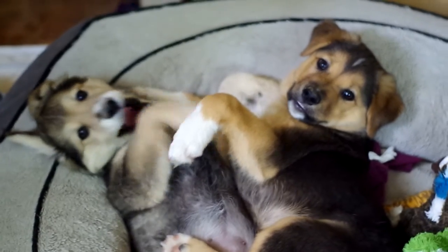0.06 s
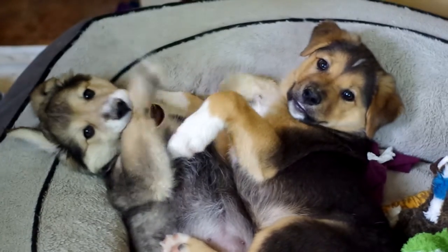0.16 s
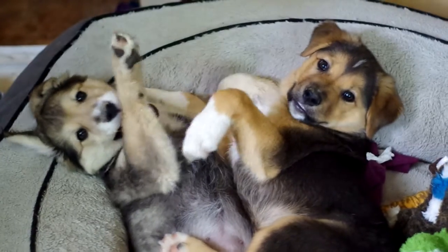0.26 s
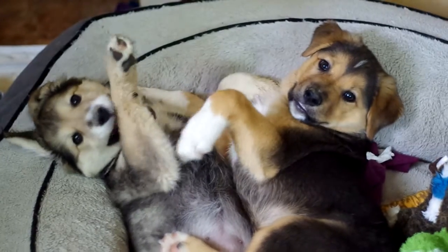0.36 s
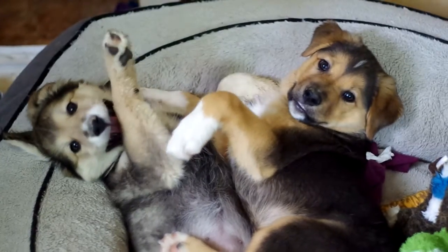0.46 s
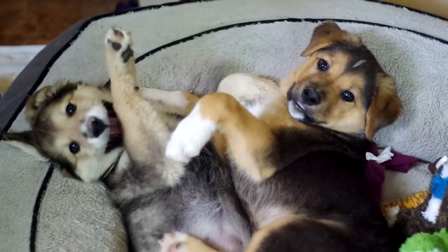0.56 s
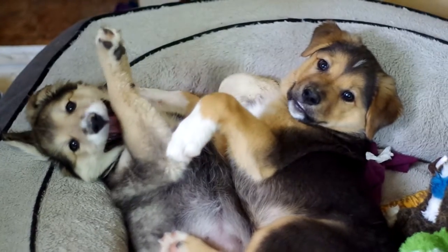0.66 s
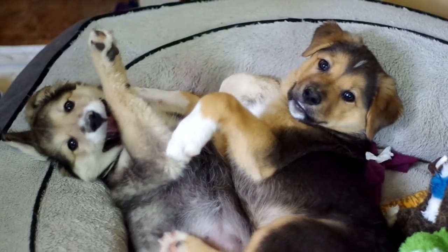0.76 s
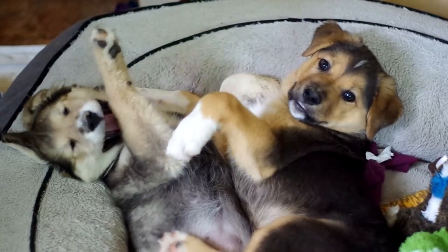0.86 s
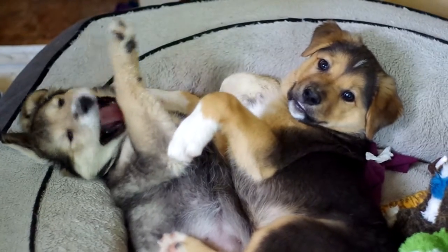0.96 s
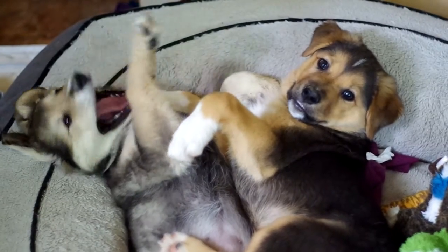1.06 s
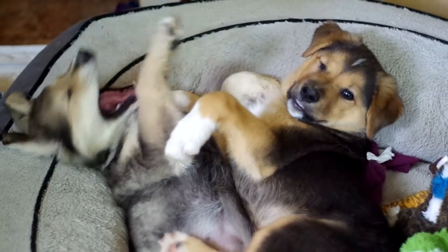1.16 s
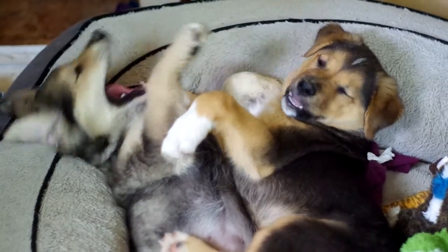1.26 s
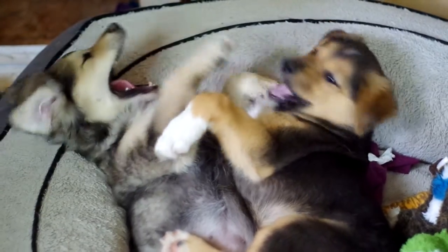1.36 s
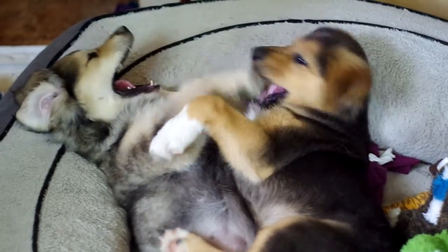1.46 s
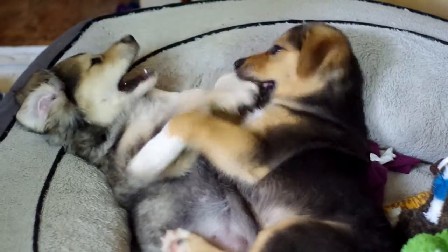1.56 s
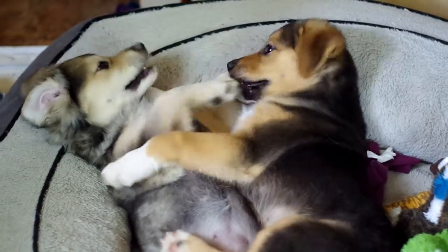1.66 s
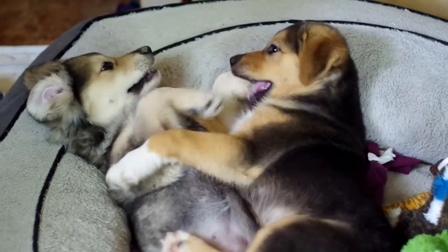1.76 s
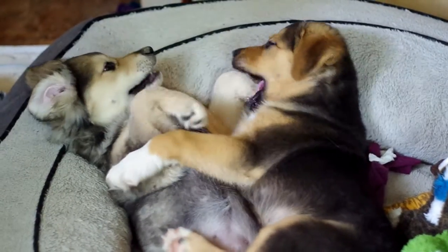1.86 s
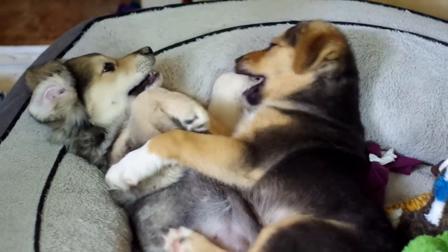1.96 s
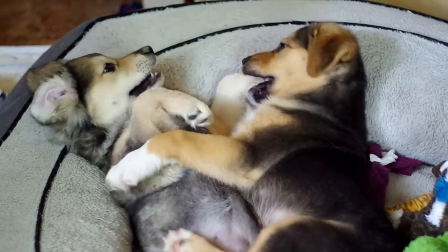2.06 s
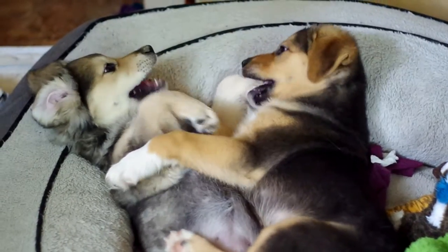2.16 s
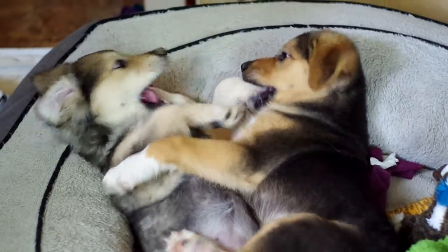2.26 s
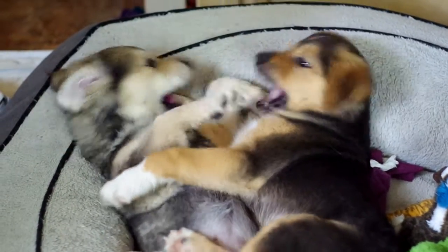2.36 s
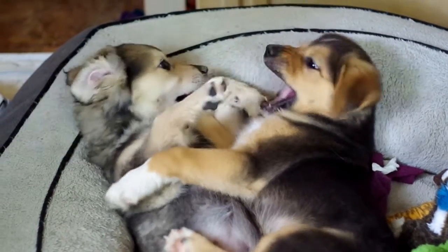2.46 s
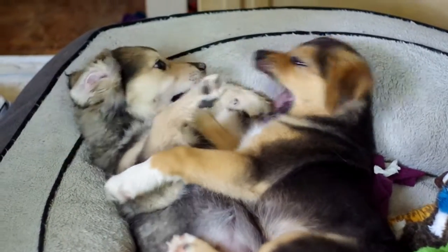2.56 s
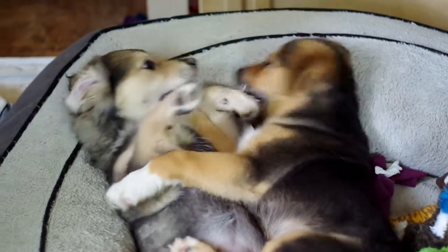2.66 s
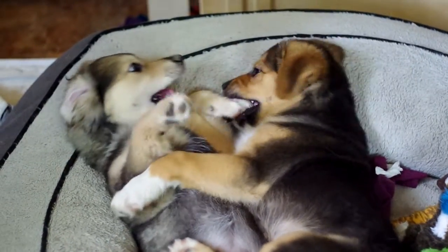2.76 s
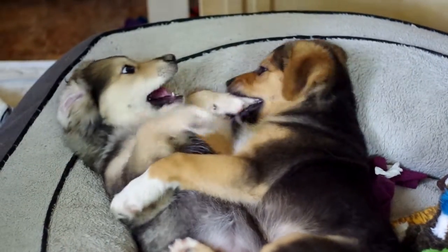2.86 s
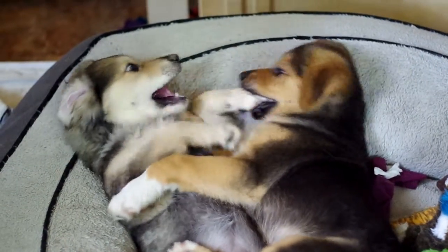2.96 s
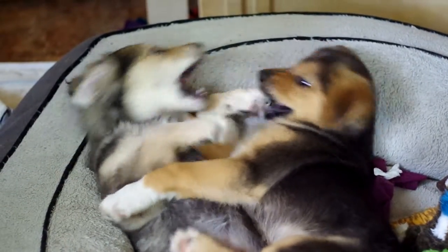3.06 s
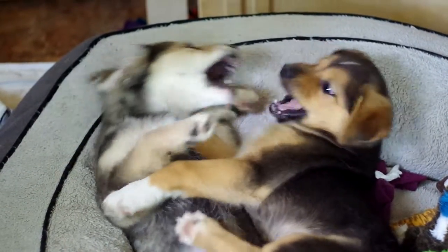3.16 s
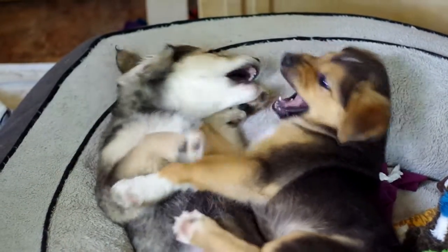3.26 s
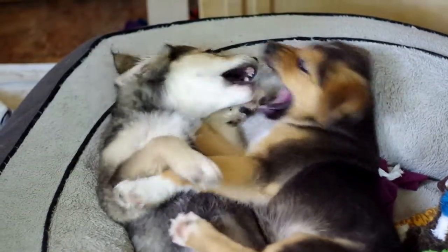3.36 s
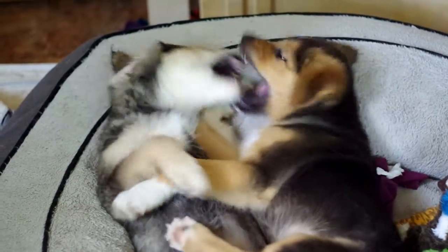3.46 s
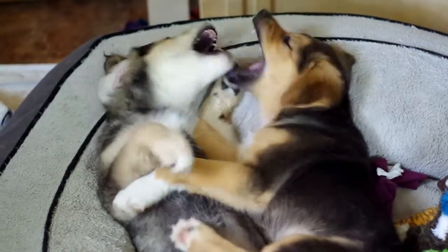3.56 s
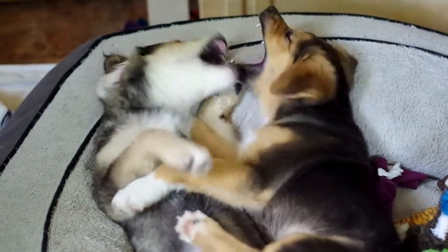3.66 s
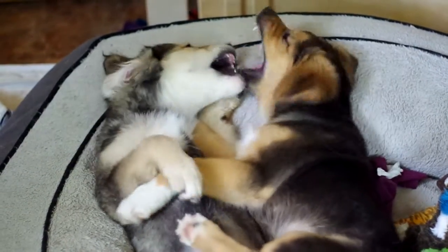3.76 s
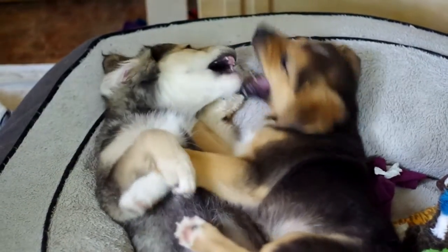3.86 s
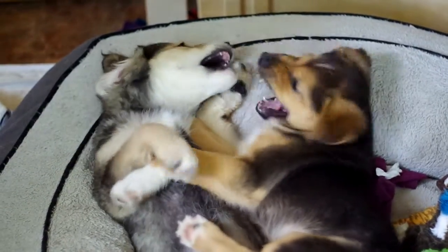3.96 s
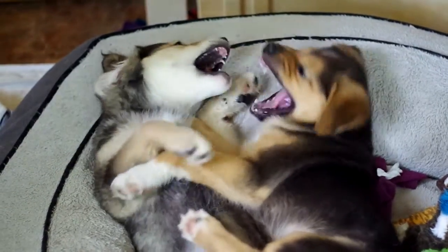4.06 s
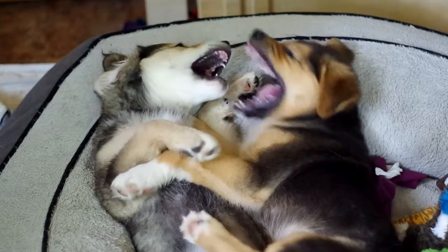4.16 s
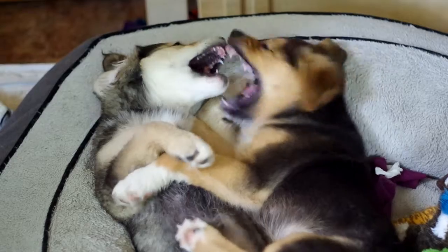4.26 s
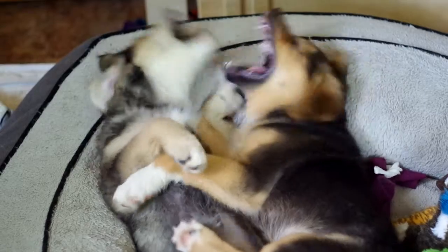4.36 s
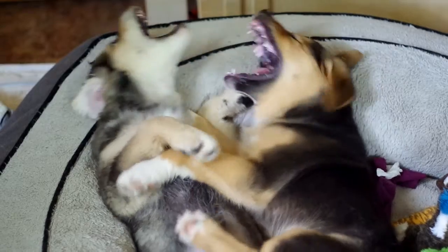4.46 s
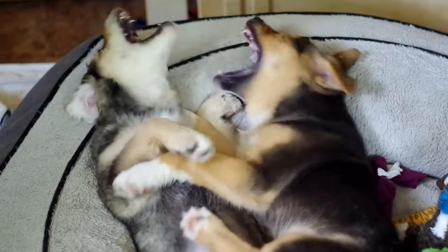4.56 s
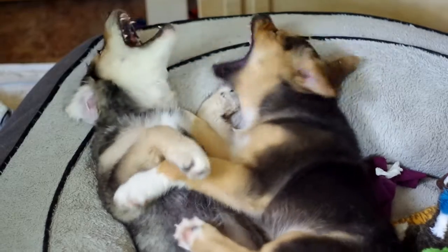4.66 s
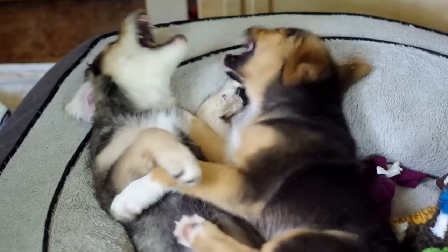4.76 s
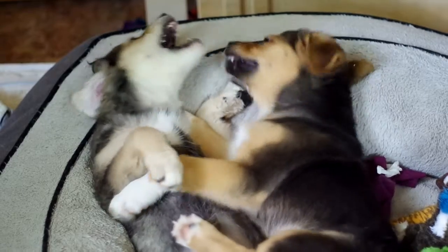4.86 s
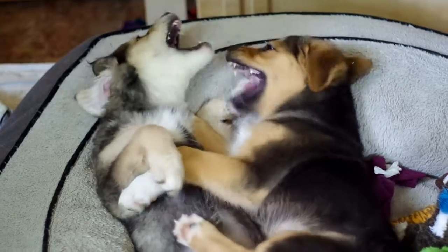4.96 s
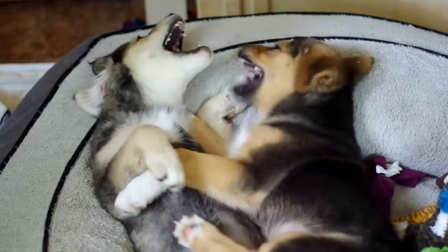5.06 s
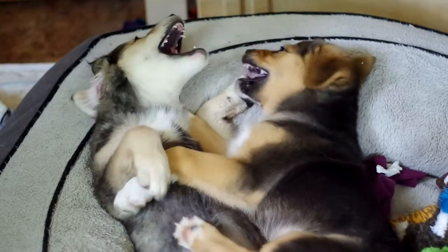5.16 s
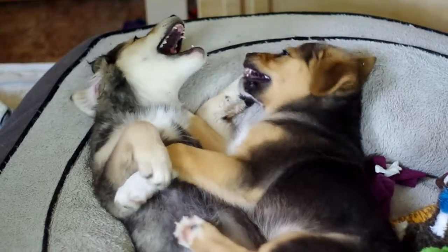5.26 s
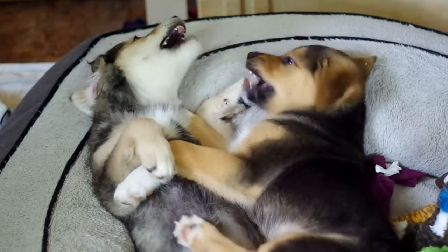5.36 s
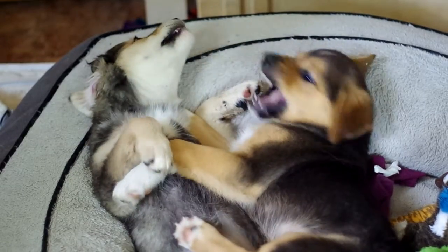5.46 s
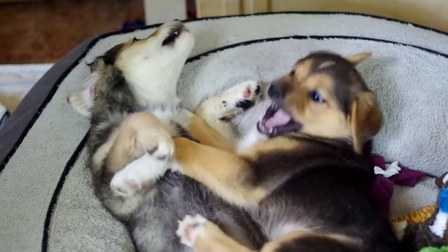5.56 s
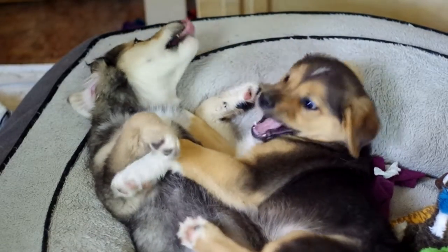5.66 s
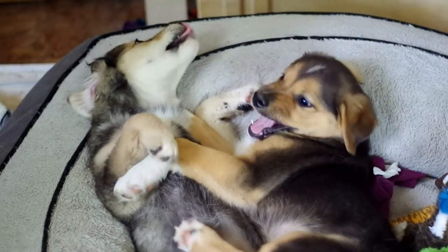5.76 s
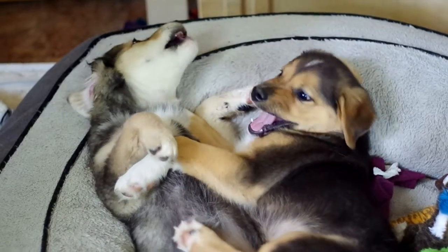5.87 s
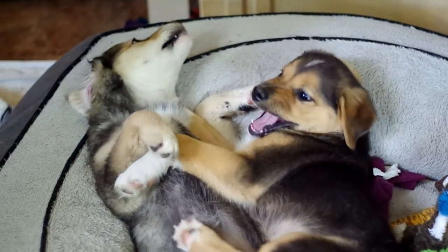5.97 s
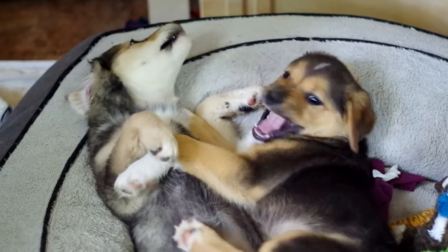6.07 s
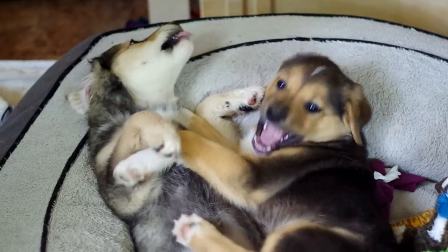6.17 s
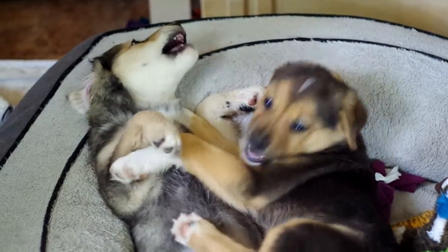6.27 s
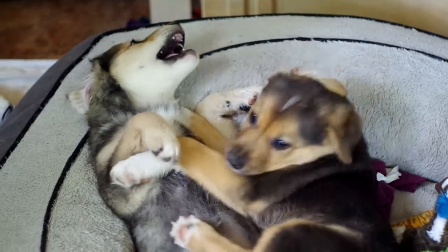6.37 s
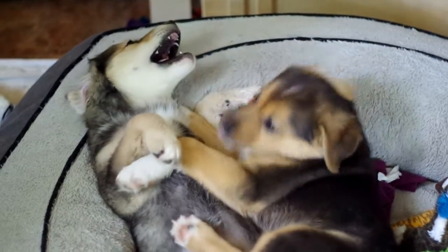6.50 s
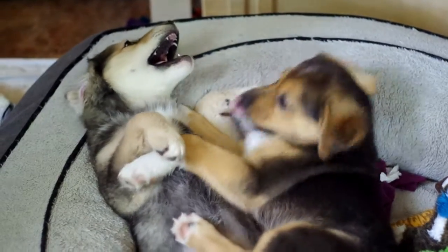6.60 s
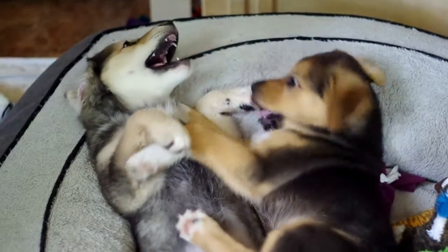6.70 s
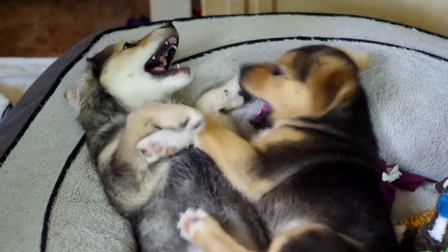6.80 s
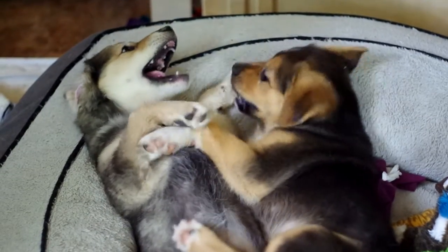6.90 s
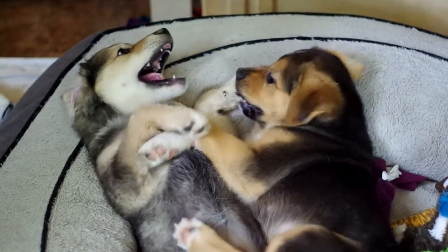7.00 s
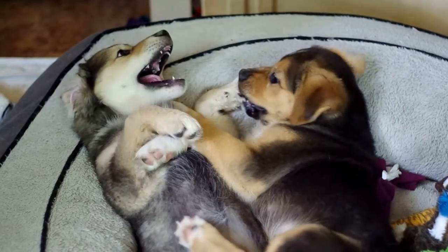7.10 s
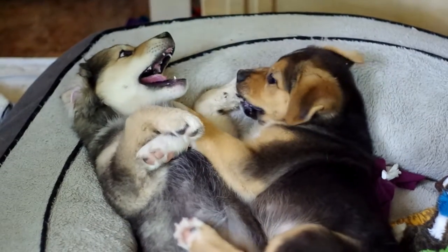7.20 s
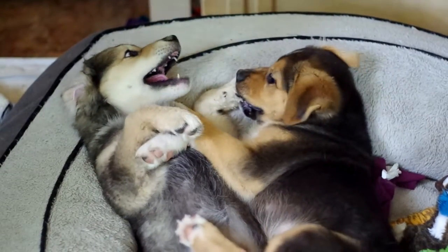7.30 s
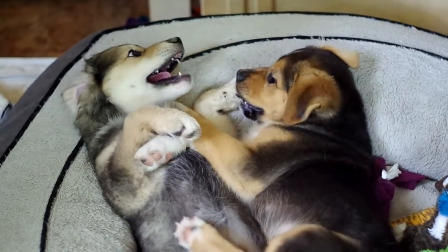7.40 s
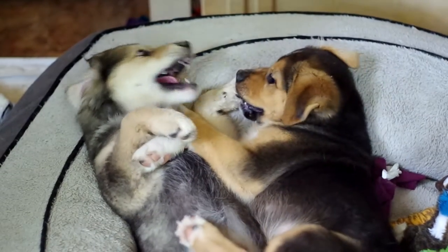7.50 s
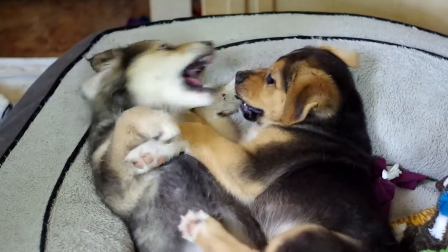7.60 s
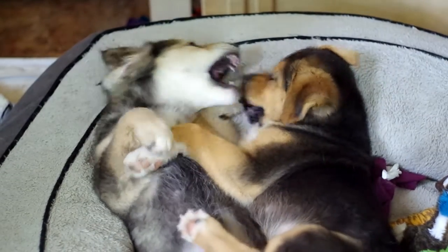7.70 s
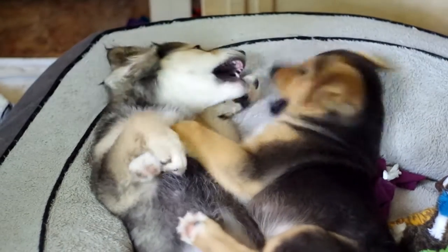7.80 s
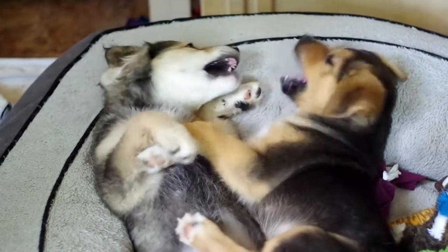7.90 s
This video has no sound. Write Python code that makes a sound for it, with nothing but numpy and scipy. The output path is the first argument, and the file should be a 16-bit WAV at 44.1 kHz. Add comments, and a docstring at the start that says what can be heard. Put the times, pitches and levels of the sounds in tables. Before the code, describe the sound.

Close, mono indoor sound of puppies play-fighting. Quiet hiss and a low unsteady appliance hum come first, then light breathy panting and soft gliding whines. The play grows busier with brief hoarse yips, airy throat whistles and small snaps of jaws and paws. One shrill yelp stands out past the middle; it eases briefly, then squeals, whines and strong hissy panting return, with a short room echo.

```python
"""Two puppies wrestle on a dog bed in a quiet room, close to one mono microphone.
Sharp yips and soft whines come from the vocal folds, as stacks of partials on a gliding pitch.
Thin high tones, mostly whistles of air forced through the narrowed throat, are chopped by the folds.
Panting hisses around the calls as shaped noise, and jaws and paws click in short noise bursts.
The room rings on behind the dogs, an appliance hums, a screen whines, and air and microphone hiss."""
import sys
import numpy as np
from scipy import signal
from scipy.fft import rfft, irfft, next_fast_len
from scipy.io import wavfile
from scipy.ndimage import uniform_filter1d, minimum_filter1d

SR = 44100
rng = np.random.default_rng(int(sys.argv[2]) if len(sys.argv) > 2 else 0)


def unload_audio(sound):
    """Save the sound as a 16-bit wav file, at the path given as the first command line argument."""
    columns = np.transpose(np.atleast_2d(sound))
    # keep every value between -1 and 1, then stretch to whole-number steps
    steps = np.round(np.clip(columns, -1, 1) * 32767)
    wavfile.write(sys.argv[1], SR, steps.astype(np.int16))


N = 350154  # length in samples
EDGE_HZ = 15750  # top of the microphone band


def amp(db):
    """dB to gain."""
    return 10 ** (np.asarray(db) / 20)


def evened(x):
    """Scaled to rms 1."""
    return x / np.sqrt(np.mean(x ** 2) + 1e-20)


def read(points, hz):
    """Value of a spectrum table on a log-frequency axis."""
    f, value = np.transpose(points)
    return np.interp(np.log(hz + 1), np.log(f + 1), value)


def add(mix, s, sound):
    """Mixes a sound in at time s."""
    part = mix[round(s * SR):][:len(sound)]
    part += sound[:len(part)]


def curves(rows, smooth_s=0.0066):
    """Columns of a table at the sample rate, corners rounded; the first column is time."""
    s, *columns = np.transpose(rows)
    t = np.arange(s[0], s[-1], 1 / SR)
    size = max(round(smooth_s * SR), 1)
    return [uniform_filter1d(np.interp(t, s, c), size, mode="nearest") for c in columns]


def wobble(length, hz):
    """Random drift of rms 1: noise low-passed at hz."""
    settle = 4000  # samples dropped while the filter settles
    lowpass = signal.butter(4, hz, fs=SR, output="sos")
    drift = signal.sosfilt(lowpass, rng.standard_normal(length + settle))
    return evened(drift[settle:])


def hiss(hz, width_hz, length=N):
    """Noise of rms 1 in a bell-shaped band."""
    f = np.fft.rfftfreq(length, 1 / SR)
    bell = 1 / (1 + (2 * (f - hz) / width_hz) ** 4)
    return evened(irfft(rfft(rng.standard_normal(length)) * bell, length))


def fades(length, rise_s, fall_s):
    """Soft start and end."""
    t = np.arange(length) / SR
    return np.clip(np.minimum(t / rise_s, t[::-1] / fall_s), 0, 1)


def torn(length, ragged, spread_hz, shimmer):
    """Complex envelope of a tone: a wavering steady part and a share that turbulence spreads around the pitch."""
    noise = (wobble(length, spread_hz) + 1j * wobble(length, spread_hz)) / np.sqrt(2)
    steady = 1 + shimmer * wobble(length, 45)
    return np.sqrt(1 - ragged) * steady + np.sqrt(ragged) * noise


def voice(rows, rough, overtones, jitter, rise_s):
    """Vocal folds: a stack of partials on a slightly unsteady pitch; the overtones are hoarser."""
    hz, *low_db, over_db = curves(rows)
    turns = np.cumsum(hz * (1 + jitter * wobble(len(hz), 121))) / SR
    low = sum(amp(db) * np.exp(2j * np.pi * k * turns) for k, db in enumerate(low_db, 1))
    over = 0
    for k in range(len(low_db) + 1, 20):
        level = amp(read(overtones, k * hz)) * (k * hz < EDGE_HZ)
        over = over + level * np.exp(2j * np.pi * k * turns + 1j * k * k)
    over *= amp(low_db[0] + over_db) * torn(len(hz), rough ** .4, 250, .3)
    low *= torn(len(hz), rough, 120, .2)
    return np.sqrt(2) * (low + over).real * fades(len(hz), rise_s, 0.0062)


def yip(start, length, hold, top_db, fade_db, start_hz, top_hz, end_hz, sag_bend, second_db, third_db, closing_db,
        over_db):
    """The mouth snaps open as the pitch reaches its top; pitch, brightness and, after a hold, level slide away."""
    rise_s, start_db, fade_bend, shut_db = .024, -9, 0.97, -8.5
    t = np.arange(0, length, .004)
    rise = np.clip(1 - t / rise_s, 0, 1)
    slide = np.clip((t - rise_s) / (length - rise_s), 0, 1)
    fall = np.clip((t - rise_s - hold) / (length - rise_s - hold), 0, 1)
    hz = top_hz + (start_hz - top_hz) * rise + (end_hz - top_hz) * slide ** sag_bend
    db = top_db + start_db * rise + fade_db * fall ** fade_bend
    # a mouth still shut dulls the upper partials
    upper_db = db + shut_db * rise + closing_db * slide
    return np.transpose([start + t, hz, db, upper_db + second_db, upper_db + third_db, upper_db - db + over_db])


def yips():
    """The sharp calls: vocal folds sounding through a mouth that snaps open."""
    # one row a yip: start [t/s], length [s], hold [s], top [level/dB], change by the end [dB],
    # starting, top and final pitch [f/Hz], bend of the pitch slide [under 1 early, over 1 late],
    # partials 2 and 3 against partial 1 [dB], change of brightness by the end [dB], overtone strength [dB]
    calls = [ (2.885, 0.13, 0.017, -36, -29, 1138, 1162, 1006, 0.47, -4, -13, 7, -9),
             (3.091, 0.14, 0.0082, -29.5, -17, 1352, 1402, 1459, 0.86, 8, -11, -38, 11),
             (3.315, 0.13, 0.019, -24.5, -27, 989, 991, 870, 0.56, 3, -13.5, -1.5, 4),
             (3.611, 0.21, 0.0065, -19.5, -30.5, 1173, 1107, 950, 0.32, -14, -3.5, -10, 4),
             (4.455, 0.2, 0.028, -33.5, -19, 1063, 1053, 1003, 1.04, -22, -14.5, 7, 7),
             (4.735, 0.22, 0.035, -28.5, -51, 1050, 1042, 1004, 0.67, -18.5, -4, -1, 0.5),
             (5.278, 0.169, 0.074, -17, -36, 1156, 1118, 1048, 0.397, -8, -6.5, -1.5, -1.5),
             (5.502, .12, .01, -49, 4.5, 1000, 909, 870, 1.2, 1, -28, -5, -4),
             (7.075, .135, .02, -26.5, -16.5, 1050, 1052, 981, 1.11, -7, -6, 8, 0),
             (7.285, 0.097, 0.03, -26, -5.5, 1117, 1271, 1117, 5.2, 7, -3.5, 3, 10),
             (7.5, 0.089, 0.014, -30, -18.5, 1029, 1067, 1152, 0.83, -2, -2.5, 1, -18),
             (7.853, .095, .01, -24.5, -1.5, 1308, 1330, 800, 6.0, -1, -12, 2, 6), ]
    # hoarseness of each yip: share of the voice that breaks up into noise [0-1]
    roughness = [.02, .015, .03, .06, .01, .01, .02, .05, .01, .012, .012, .025]
    # overtones above partial 3, before strength and brightness: [f/Hz], [level/dB against partial 1]
    overtones = [(1200, -17), (2500, -20), (3500, -13.5), (5000, -26), (6500, -28), (8200, -32.5),
                 (9800, -34), (11000, -35.5), (13000, -34), (15500, -49)]
    track = np.zeros(N)
    for row, rough in zip(calls, roughness):
        add(track, row[0], voice(yip(*row), rough, overtones, jitter=0.0088, rise_s=0.0084))
    return track


def whine(rows, second_db, third_db):
    """The partials above the first follow the opening of the mouth, the second only in part."""
    second_follows, overtone_db = 0.76, 2.5
    s, hz, db, mouth_db = np.transpose(rows)
    second = db + second_follows * mouth_db + second_db
    third = db + mouth_db + third_db
    return np.transpose([s, hz, db, second, third, mouth_db + overtone_db])


def whines():
    """The soft nasal calls: vocal folds, each call on its own wandering pitch."""
    # one curve a whine: [t/s], pitch [f/Hz], [level/dB], mouth opening as brightness [dB]
    calls = [
        [(1.75, 1014, -46, -6), (1.785, 961, -40, -5), (1.81, 922, -47.5, 0), (1.848, 898.4, -44, 1),
         (1.996, 945, -42, -4), (2.06, 880, -42, -10), (2.15, 835, -44.5, -13), (2.298, 812, -54, -3),
         (2.45, 705, -49, -4)],
        [(2.43, 712, -55, -23), (2.54, 828, -37.5, -17), (2.62, 891, -52, -9), (2.68, 910, -70, -26)],
        [(2.89, 738, -52, 1), (2.932, 703, -42.5, -5), (2.996, 676, -48, -4), (3.08, 506, -52.5, 4)],
        [(3.15, 388, -48.5, -18), (3.21, 522, -47, 5), (3.358, 522, -54, 11), (3.42, 583, -41, -9)],
        [(3.43, 668, -50, 6), (3.46, 773, -50, -1), (3.5, 775, -45.5, -1), (3.53, 695, -42, -7.5),
         (3.58, 602, -48, -1), (3.66, 606, -37.5, -9)],
        [(3.66, 665, -46, -15), (3.7, 752, -44.5, 5), (3.76, 811, -49, -15), (3.85, 779, -51.5, 2)],
        [(3.72, 550, -56, -15), (3.75, 550, -44, -15), (3.8, 540, -65, -15)],
        [(3.9, 1027, -34.5, 5), (3.958, 914, -37.5, 4), (4.046, 841, -38, -2), (4.132, 860, -38.5, 0.5),
         (4.222, 1173, -51, -9), (4.35, 1156, -55, -4), (4.45, 1013, -44, -20)],
        [(4.15, 517, -65, 0), (4.224, 531, -54, -5), (4.32, 535, -66, 0)],
        [(4.8, 1006, -63, 8), (4.838, 797, -48.5, -12), (4.87, 695, -51, -15), (4.9, 689, -62, -5)],
        [(5.24, 540, -53, 1), (5.314, 546, -32.5, 7.5), (5.382, 484, -57.5, 3), (5.448, 513, -44, 6),
         (5.58, 477.5, -65, -2), (5.63, 482, -45, -4), (5.7, 435, -61, 0)],
        [(6.06, 613, -45.5, -5), (6.095, 630, -53, -8), (6.105, 762, -37, -9), (6.124, 861, -42, 1),
         (6.186, 854.5, -49.5, 13.5), (6.24, 842, -33.5, -6.5), (6.285, 742, -33, -8.5), (6.337, 748, -53, -18),
         (6.4, 794, -56, -11)],
        [(6.45, 1052, -63, 2), (6.484, 1030, -49, 4), (6.53, 980, -73, 2)],
        [(7.09, 875, -48, -10), (7.108, 819, -43.5, -3), (7.282, 726, -52, 2), (7.326, 821, -48, 1),
         (7.538, 709, -46, -2), (7.772, 712.5, -47, -7), (7.855, 672, -47, 11)],
        [(7.86, 497, -50, -2), (7.908, 481, -52.5, 19), (7.94, 552, -44, 18)],
        [(4.6, 1007, -52, -10), (4.66, 1032, -50.5, -8), (4.74, 1094, -42, -8)],
    ]
    # each whine: partial 2, partial 3 against partial 1, before brightness [level/dB]
    partials = [(-4, -21.5), (10.5, -16), (-10, -15), (-8.5, -10.5), (-6.5, -13.5), (-15.5, -25),
                (-20, -30), (-10, -8), (-12, -28), (-22, -25), (-6.5, -19), (-10.5, -15.5), (-8, -25),
                (-7.5, -15), (-15, -18), (-22, -3)]
    # hoarseness of each whine: share of the voice that breaks up into noise [0-1]
    roughness = [.008, .008, .02, .02, .02, .03, .02, .008, .02, .06, .12, .008, .04, .005, .04, .01]
    # nasal overtones, before brightness: [f/Hz], [level/dB against partial 1]
    overtones = [(1200, -13), (2700, -17), (3700, -22.5), (4700, -23.5), (5600, -17), (6500, -30),
                 (8500, -44), (15500, -53)]
    track = np.zeros(N)
    for rows, partials_db, rough in zip(calls, partials, roughness):
        sound = voice(whine(rows, *partials_db), rough, overtones, jitter=0.0052, rise_s=0.0064)
        add(track, rows[0][0], sound)
    return track


def high_tone(rows, ragged, octave_db, jitter=.003, rush_db=-30):
    """One gliding tone and its octave, as an air jet sings them, with a wide rush of air around both."""
    hz, tone_db = curves(rows)
    turns = np.cumsum(hz * (1 + jitter * wobble(len(hz), 160))) / SR
    jet = torn(len(hz), ragged, 330, .3) + amp(rush_db) * torn(len(hz), 1, 2200, 0)
    octave = amp(tone_db + octave_db) * (2 * hz < SR / 2)
    octave = octave * torn(len(hz), .6 * np.sqrt(ragged), 400, 0)
    tones = amp(tone_db) * np.exp(2j * np.pi * turns) + octave * np.exp(4j * np.pi * turns)
    return np.sqrt(2) * (jet * tones).real * fades(len(hz), 0.0086, 0.027)


def high_tones():
    """Mostly whistles of air forced through the narrowed throat, with a few voice overtones and side tones."""
    # one curve a high tone: [t/s], pitch [f/Hz], [level/dB];
    # whistles, with a few voice overtones and side tones among them
    tones = [
        [(0.05, 8100, -69), (0.19, 8280, -61.5), (0.27, 8200, -66)],
        [(1.19, 9300, -57), (1.262, 9970, -44.5), (1.31, 10070, -48.5), (1.366, 10900, -50), (1.42, 11100, -55)],
        [(1.2, 6200, -60), (1.238, 6560, -65), (1.42, 6535, -62)],
        [(1.58, 11200, -52), (1.63, 12000, -60), (1.66, 10700, -47.5), (1.71, 10700, -65)],
        [(1.575, 5660, -64), (1.61, 6270, -53), (1.68, 6350, -59), (1.71, 6370, -68)],
        [(1.72, 8793, -59), (1.728, 8920, -47), (1.79, 8800, -60)],
        [(2.14, 5800, -81), (2.22, 6100, -63)],
        [(2.225, 6130, -59), (2.258, 6740, -34), (2.296, 7900, -34), (2.36, 8600, -48)],
        [(2.33, 11020, -47), (2.382, 11900, -38), (2.45, 11800, -63)],
        [(2.54, 7280, -56), (2.568, 7430, -53), (2.64, 6100, -54)],
        [(2.84, 6391, -55), (2.888, 7640, -54.5), (2.928, 7300, -58), (2.978, 6400, -57.5), (3.054, 7800, -56),
         (3.1, 8850, -52)],
        [(2.88, 5310, -53), (3.038, 5000, -53.5), (3.09, 5550, -42.5), (3.15, 5630, -44)],
        [(3.1, 8870, -52), (3.16, 8470, -36), (3.21, 7730, -35.5), (3.27, 6780, -39), (3.304, 6760, -35),
         (3.4, 6840, -68)],
        [(3.2, 6360, -40), (3.32, 6120, -26), (3.45, 6130, -88)],
        [(3.58, 6465, -42), (3.602, 6670, -22), (3.63, 7270, -34), (3.724, 6970, -27), (3.75, 6900, -58),
         (3.864, 7170, -36), (3.95, 7670, -54)],
        [(4.15, 8130, -48), (4.384, 8150, -32.5), (4.5, 7960, -40)],
        [(4.22, 6340, -45), (4.29, 6160, -35), (4.346, 6266, -31), (4.422, 6656, -25), (4.46, 6127, -24.5),
         (4.576, 5980, -22), (4.616, 5986, -31.5), (4.692, 5795, -23.5), (4.878, 5884, -27.5),
         (5.0, 6030, -25.5), (5.1, 5950, -62)],
        [(4.98, 6850, -26.5), (5.038, 6920, -39), (5.1, 7150, -53)],
        [(5.265, 6350, -35.5), (5.299, 6584, -7.5), (5.385, 6710, -34.5), (5.403, 6905, -13),
         (5.473, 7160, -37), (5.55, 6475, -52)],
        [(5.83, 5850, -38.5), (5.86, 5820, -45), (5.88, 5380, -61), (5.96, 5460, -48), (6.05, 5400, -66)],
        [(5.95, 6180, -54), (5.998, 6300, -53.5), (6.08, 6360, -70)],
        [(6.42, 5786, -47), (6.44, 6125, -27), (6.49, 6060, -22.5), (6.51, 6700, -23), (6.528, 6420, -25),
         (6.608, 6506, -22.5), (6.754, 6210, -47.5), (6.93, 6670, -64)],
        [(6.485, 6900, -26), (6.525, 6960, -24), (6.56, 6460, -41)],
        [(6.94, 6250, -33.5), (6.984, 6440, -35.5), (7.076, 7640, -40), (7.148, 7550, -51), (7.19, 6960, -45),
         (7.245, 7000, -37.5), (7.274, 8300, -40), (7.3, 9910, -23)],
        [(7.44, 7200, -38), (7.512, 7440, -40.5), (7.606, 7590, -44), (7.636, 7830, -37), (7.658, 9000, -32.5),
         (7.696, 9360, -38.5), (7.8, 8740, -34.5), (7.94, 8900, -52)],
        [(1.2, 5500, -66), (1.3, 5700, -63), (1.45, 5750, -61)],
        [(4.14, 6450, -57), (4.27, 6690, -32.5), (4.4, 6700, -47)],
        [(4.18, 9400, -51), (4.3, 9380, -52), (4.45, 9300, -57)],
        [(5.48, 6400, -45), (5.52, 6530, -37.5), (5.6, 6300, -60)],
        [(7.42, 5680, -39), (7.5, 6000, -45), (7.62, 6600, -45)],
    ]
    # share of each high tone that breaks up into a band of noise [0-1]
    raggedness = [.97, .25, .6, .4, .6, .1, .1, .35, .85, .5, .25, .5, .25, .1, .25, .03, .03, .4, .12, .15,
                  .03, .08, .1, .2, .4, .7, .15, .05, .08, .5]
    # octave of each high tone against the tone itself [level/dB]
    octaves = [-25, -40, -25, -40, -22, -40, 19.5, -11, -40, 9.5, 0, -15, 4, -35, -10, -40, -8, -25, -12,
               -21, 2, -5, -25, -0.5, -3, -20, -14, -40, 8, -25]
    track = np.zeros(N)
    for rows, ragged, octave_db in zip(tones, raggedness, octaves):
        add(track, rows[0][0], high_tone(rows, ragged, octave_db))
    return track


def chopped(jets, folds):
    """The folds chop the air jet, which puts side tones around each high tone, stronger above it."""
    size = next_fast_len(N)
    chop = signal.hilbert(np.tanh(amp(36) * folds), size)[:N]
    return (signal.hilbert(jets, size)[:N] * (1 + .2 * chop + .05 * chop.conj())).real


def panting(strands_db=4.2, patchy_db=1.6, flutter_db=1.2):
    """Turbulent air in throat, nose and teeth; short-lived narrow resonances streak it."""
    # one row a pant: start [t/s], length [s], hiss of the throat [level/dB], hiss of the nose [level/dB],
    # centre of the nose hiss [f/Hz], hiss at the teeth [level/dB]; levels against each other
    pants = [(1.19, 0.34, -77, -50.5, 8850, -58), (1.57, .2, -74, -52.5, 7100, -64),
             (1.8, .15, -72, -63, 7500, -65), (2.222, 0.34, -52, -33.5, 8600, -39),
             (2.448, 0.2, -76, -36, 9100, -43), (2.853, 0.17, -53, -58, 7000, -46),
             (3.043, 0.19, -40, -42, 9050, -34), (3.11, 0.31, -46, -31, 6750, -39),
             (3.58, 0.29, -44, -32.5, 7280, -40.5), (3.848, 0.34, -45, -38.5, 8070, -42),
             (4.064, 0.32, -55, -33, 6400, -38.5), (4.306, 0.36, -53, -27, 7280, -36),
             (4.574, 0.36, -42, -28.5, 7660, -35), (4.828, 0.26, -41, -31, 7350, -34),
             (5.277, 0.21, -34.5, -28.5, 7450, -46), (5.415, 0.18, -63, -41, 7150, -31.5),
             (5.541, 0.24, -44, -36.5, 7060, -38), (5.803, 0.14, -73, -44.5, 6240, -66),
             (6.04, 0.39, -61, -41, 7650, -51), (6.422, 0.43, -49.5, -35.5, 7030, -33.5),
             (6.92, 0.42, -45, -36.5, 6950, -38.5), (7.25, 0.23, -36, -35, 7200, -35.5),
             (7.45, .2, -43, -29.5, 6930, -45), (7.611, 0.36, -36.5, -23, 7330, -30.5)]
    throat_hz, throat_width_hz, nose_width_hz, teeth_hz, teeth_width_hz = 3230, 2740, 3490, 13100, 4440
    rise, fall, ends_db = 0.31, 0.47, -14.5  # shares of a pant's length; level at its two ends
    start, length, throat_db, nose_db, nose_hz, teeth_db = np.transpose(pants)
    frames, hz = N // 128 + 5, np.fft.rfftfreq(512, 1 / SR)[:, None]
    t = np.arange(frames) * 128 / SR
    u = (t - start[:, None]) / length[:, None]  # 0 to 1 through each pant
    slope = np.maximum(np.maximum(1 - u / rise, 1 - (1 - u) / fall), 0)
    push = amp(ends_db * slope ** 2)
    bands = [(throat_db, throat_hz, throat_width_hz), (nose_db, nose_hz, nose_width_hz),
             (teeth_db, teeth_hz, teeth_width_hz)]
    colour = sum(amp(db) / np.sqrt(width) / (1 + (2 * (hz - f) / width) ** 6) for db, f, width in bands)
    colour = np.sqrt(colour ** 2 @ push ** 2)  # overlapping pants add in power
    a, b, strands, patches = rng.standard_normal((frames, 257, 4)).T
    # strands: narrow in pitch and 0.1 s long; patches: broad and brief
    strands = evened(uniform_filter1d(uniform_filter1d(strands, size=2, axis=0), size=35, axis=1))
    patches = evened(uniform_filter1d(uniform_filter1d(patches, size=12, axis=0), size=12, axis=1))
    flutter = evened(uniform_filter1d(rng.standard_normal(frames), size=4))
    texture_db = strands_db * strands + patchy_db * patches + flutter_db * flutter
    z = (a + 1j * b) * colour * amp(texture_db)
    return amp(10.0) * signal.istft(z, nperseg=512, noverlap=384)[1][:N]


def click(db, hz, t60):
    """A short burst of air or cloth, nearly two octaves wide, that dies away."""
    t = np.arange(9000) / SR
    decay = amp(db - 60 * t / max(t60, .005))
    return decay * hiss(hz, 1.18 * hz, len(t)) * np.minimum(t / 0.0014, 1)


def clicks():
    """Snaps and puffs of jaws and paws, each a decaying noise burst."""
    # one row a click: [t/s], starting [level/dB], centre [f/Hz], t60 [s]
    blows = [(1.455, -45, 6040, 0.063), (2.6, -44, 7000, .03), (2.695, -47, 2180, 0.41),
             (3.511, -45.5, 9000, 0.036), (3.845, -44.5, 3000, 0.11), (5.609, -38, 1780, 0.095),
             (6.388, -56, 9000, .03), (6.43, -50.5, 2800, 1)]
    track = np.zeros(N)
    for s, *blow in blows:
        add(track, s, click(*blow))
    return track


def room(x):
    """Sparse reflections of random sign, each band dying at its own speed."""
    # decay of the room: [f/Hz], t60 [s]
    decay = [(300, 0.2), (1300, 0.3), (3500, 0.29), (7000, 0.3), (14000, 0.13)]
    taps = np.zeros(SR)
    at = np.arange(150, SR - 20, 20)
    taps[at + rng.integers(0, 20, len(at))] = rng.choice([-1., 1.], len(at))
    hz, t, z = signal.stft(taps, SR, nperseg=256)
    t60 = np.maximum(read(decay, hz), .05)[:, None]
    tail = signal.istft(z * amp(-60 * t / t60), SR, nperseg=256)[1]
    return signal.fftconvolve(x, tail / np.linalg.norm(tail))[:N]


def background():
    """Room air and microphone noise whose level drifts, an unsteady hum and the whine of a screen."""
    # colour of the air noise: [f/Hz], relative density [level/dB per Hz]
    air_colour = [(8.8, -33), (15, 0), (76, -3), (111, -2), (367, -8.5), (638, -8), (930, -10.5),
                  (1400, -13), (5480, -18.5), (15600, -19.5)]
    # drift of the air noise, set by its bass: [t/s], [level/dB]
    air_drift = [(0.0, -60.5), (0.88, -58), (2.3, -57), (7.94, -56)]
    # wavering tones of the appliance: [f/Hz], width [Hz], relative [level/dB]
    hum_tones = [(103.7, 9.3, 2.5), (114.7, 6.4, 1.5), (232.7, 17, -9.5)]
    # drift of the whole hum: [t/s], [level/dB]
    hum_drift = [(0.0, -68), (0.64, -54), (1.68, -54.5), (1.9, -62), (2.43, -51.5), (3.05, -56),
                 (6.8, -69.5), (7.94, -77)]
    # steady electric tone of the screen: [f/Hz], [level/dB]
    screen_tone = (14999, -75)
    hz, t = np.fft.rfftfreq(N, 1 / SR), np.arange(N) / SR
    air = irfft(rfft(rng.standard_normal(N)) * amp(read(air_colour, hz)), N)
    bass = irfft(rfft(air) * (hz > 30) * (hz < 330), N)
    air *= amp(np.interp(t, *np.transpose(air_drift))) / np.std(bass)
    hum = evened(sum(amp(db) * hiss(f, width) for f, width, db in hum_tones))
    hum *= amp(np.interp(t, *np.transpose(hum_drift)))
    tone_hz, tone_db = screen_tone
    screen = np.sqrt(2) * amp(tone_db) * np.sin(2 * np.pi * tone_hz * t)
    return air + hum + screen


def scene():
    """Both puppies close by, their echo in the room and the background, at one microphone."""
    folds = yips() + whines()
    jets = chopped(high_tones(), folds)
    dogs = folds + jets + clicks() + panting()
    mono = amp(3.5) * dogs + amp(-3.0) * room(dogs) + background()
    return np.array([mono, mono])


def record(dry):
    """A quick limiter holds the loudest peaks; then the band limit."""
    headroom = minimum_filter1d(np.minimum(.75 / (abs(dry) + 1e-9), 1), size=265, axis=1)
    limited = dry * uniform_filter1d(headroom, size=133, axis=1)
    lowpass = signal.firwin(1023, EDGE_HZ, window=("kaiser", 10), fs=SR)
    return signal.oaconvolve(limited, lowpass[None], "same", axes=1)


dry = scene()
out = record(dry)
unload_audio(out)
```